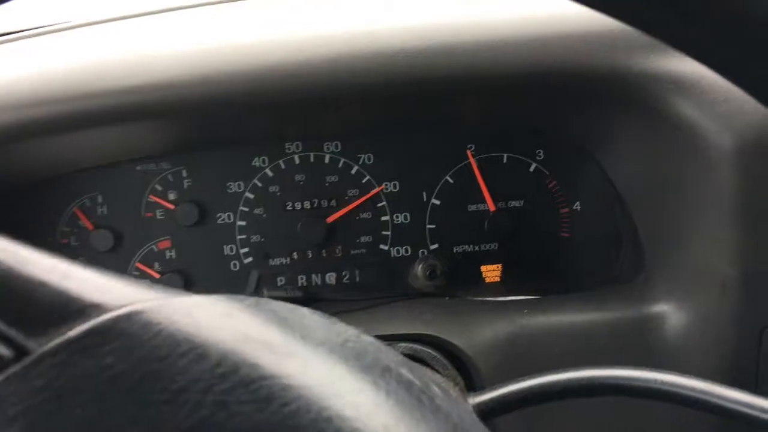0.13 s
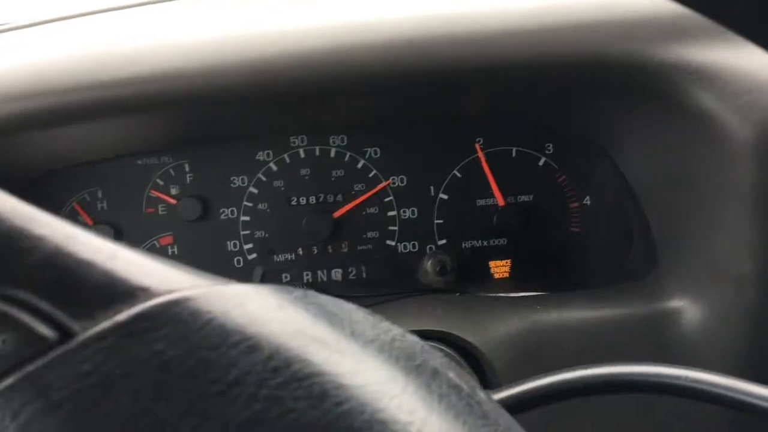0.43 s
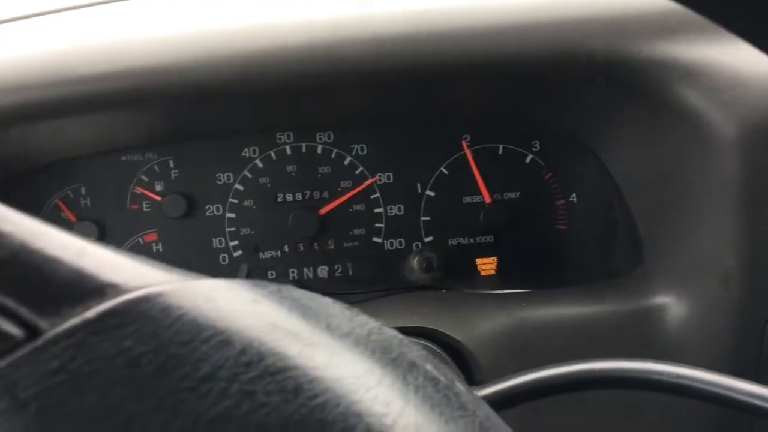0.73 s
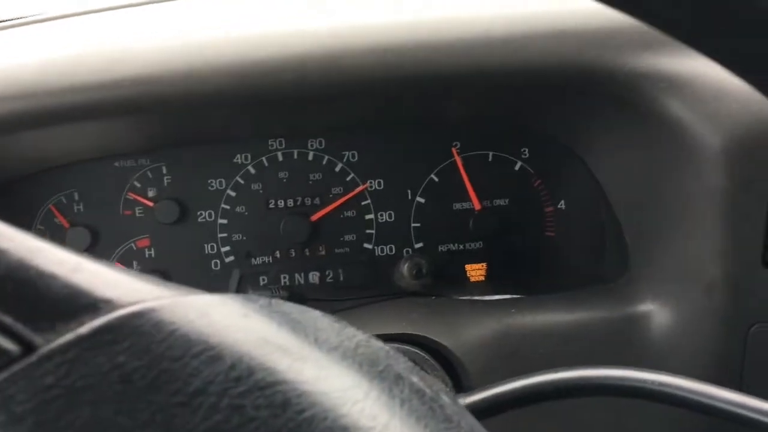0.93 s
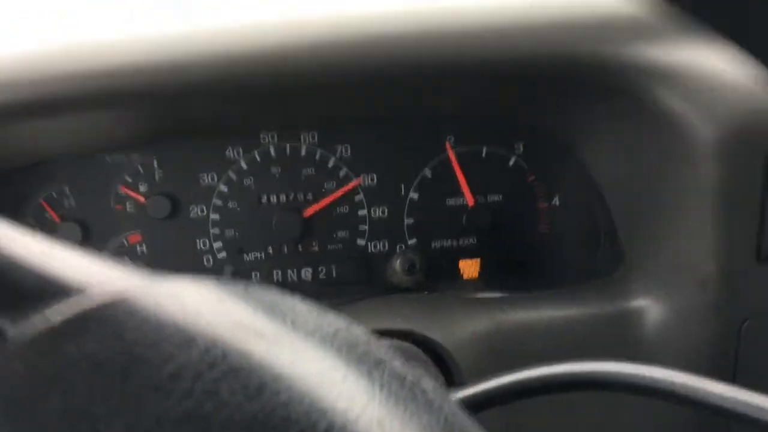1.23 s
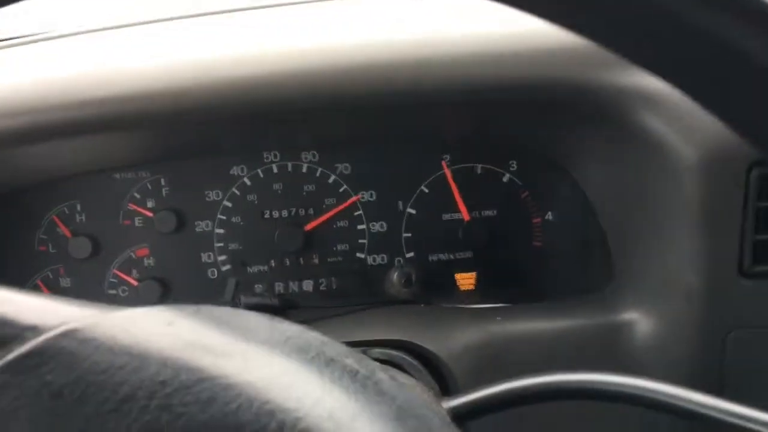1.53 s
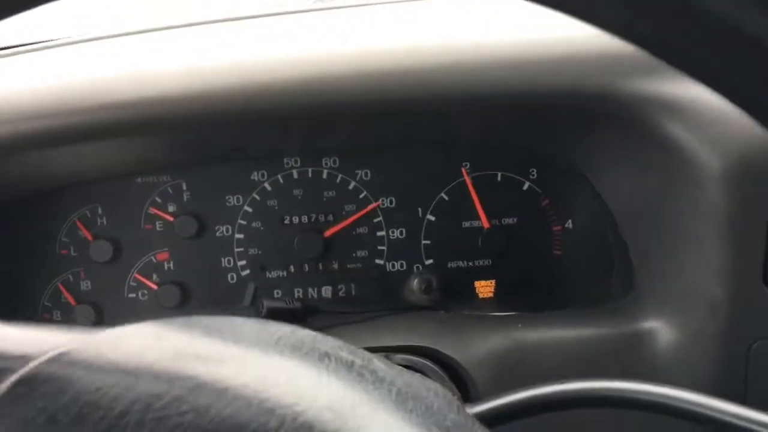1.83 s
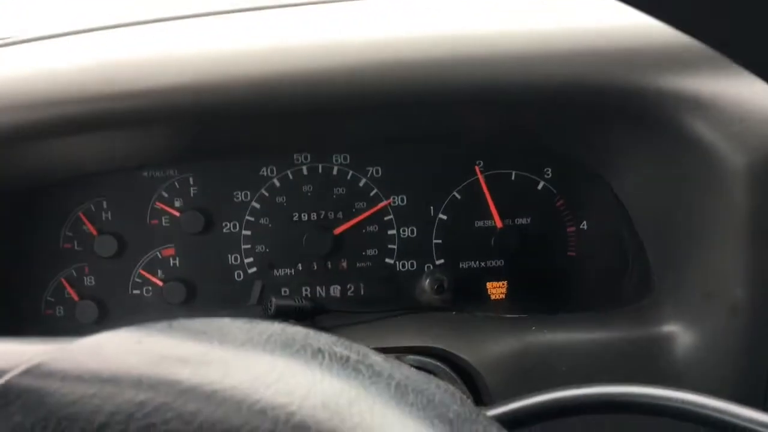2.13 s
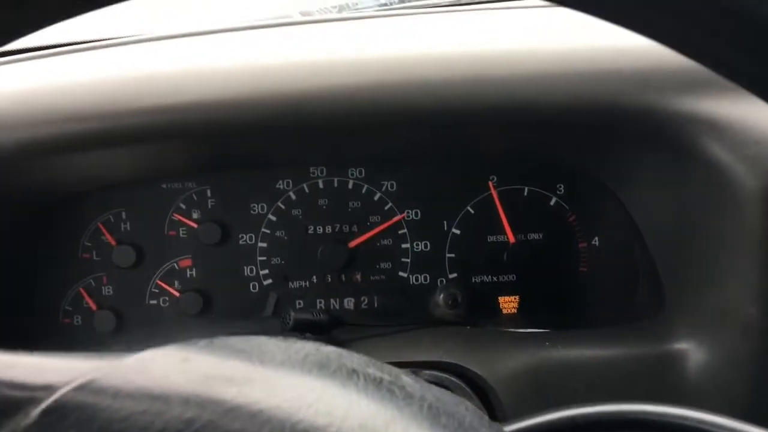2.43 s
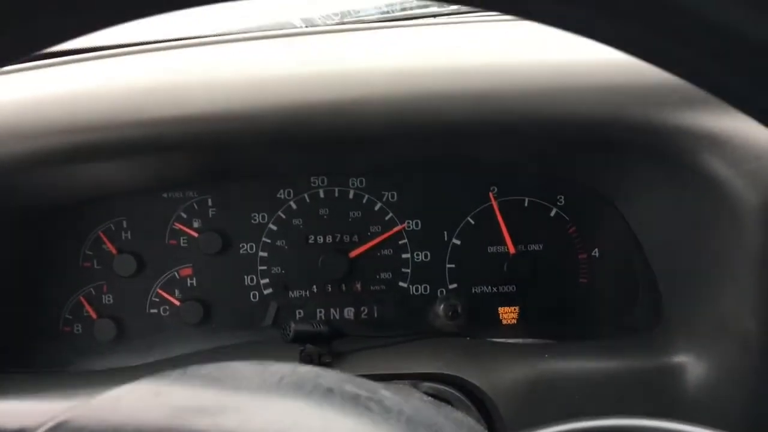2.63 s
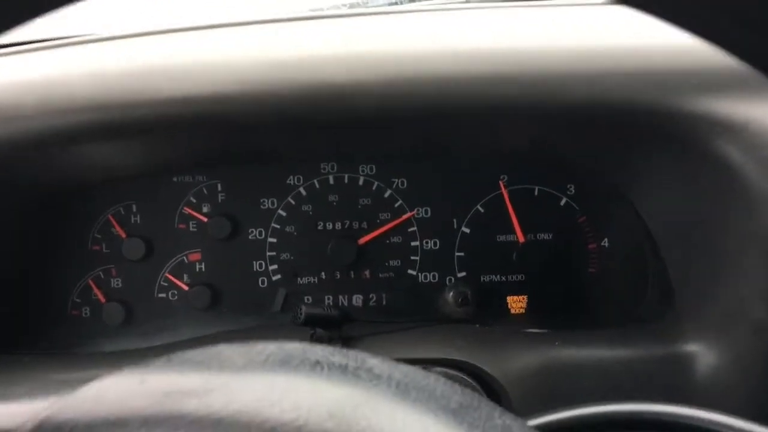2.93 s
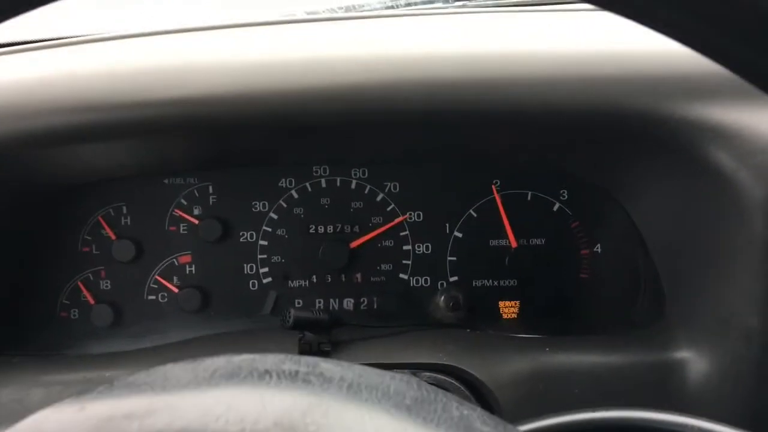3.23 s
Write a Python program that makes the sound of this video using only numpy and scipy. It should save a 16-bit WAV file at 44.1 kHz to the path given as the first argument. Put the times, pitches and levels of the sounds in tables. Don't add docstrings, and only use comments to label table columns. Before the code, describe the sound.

Turbocharger surge heard inside a diesel truck cab at steady highway speed: low engine boom and road roar with a pulsing hiss, then the hiss dies and eight quick hooting puffs flutter, close at the dashboard.

```python
import sys
import numpy as np
from scipy import signal
from scipy.fft import rfft, irfft
from scipy.io import wavfile

SR = 44100
rng = np.random.default_rng(int(sys.argv[2]) if len(sys.argv) > 2 else 0)


def to_linear_factor(level_db):
    exponent = np.asarray(level_db, float) / 20
    return 10 ** exponent


def wav_out(sig):
    wavfile.write(sys.argv[1], SR, np.round(np.clip(np.atleast_2d(sig).T, -1, 1) * 32767).astype(np.int16))


N = 148617
T = np.arange(N) / SR

# (time [s], four-stroke cycles per second [Hz])
ENGINE_SPEED = [(0, 16.62), (1.1, 16.615), (1.5, 16.585), (2.1, 16.59), (2.3, 16.72), (2.55, 16.57),
                (3.4, 16.54)]
WHEEL_HZ = 12.39
WOBBLE_RAD = .15


def rms_one(x):
    return x / np.sqrt(np.mean(x ** 2) + 1e-20)


def in_time(rows):
    s, *columns = np.transpose(rows)
    return [np.interp(T, s, c) for c in columns]


def drift(rate_hz):
    r = np.exp(-80 * np.pi * rate_hz / SR)
    noise = rng.standard_normal(N // 40 + 2002)
    slow = signal.lfilter([1], [1, -2 * r, r * r], noise)[2000:]
    return np.interp(np.arange(N) / 40, np.arange(len(slow)), rms_one(slow))


def air(spectrum, peaks, patchy_db):
    hz = np.maximum(np.arange(N // 2 + 1) * SR / N, 1)
    colour_hz, colour_db = np.transpose(spectrum)
    db = np.interp(np.log(hz), np.log(colour_hz), colour_db, left=-80)
    for centre, width, lift in peaks:
        db = db + lift / (1 + (2 * (hz - centre) / width) ** 2)
    full = rfft(rng.standard_normal(N)) * to_linear_factor(db)
    half_octave = np.floor(2 * np.log2(hz))
    total = np.zeros(N)
    for k in range(8, 29):
        total += irfft(full * (half_octave == k), N) * to_linear_factor(patchy_db * drift(9.9))
    return rms_one(total)


def orders(turns, table, wobble_rad, shape):
    total = np.zeros(N)
    for multiple, db in table:
        level = np.sqrt(2) * to_linear_factor(db + .8 * drift(1.6))
        phase = 2 * np.pi * (round(multiple) * turns + shape) + wobble_rad * drift(2)
        total += level * np.cos(phase)
    return total


def road_and_wind():
    # (frequency [Hz], density [dB per Hz])
    roar = [(22, -29), (52, -2), (75, 0.5), (140, -5.5), (300, -18.5), (500, -23.5), (1200, -28.5),
            (4000, -42)]
    # (frequency [Hz], width [Hz], lift [dB])
    cab_modes = [(635, 76, 10.5), (862, 55, 3.5), (1625, 49, 3), (1800, 89, 3.5), (2004, 40, 7),
                 (2310, 130, 3.5), (2500, 88, 8)]
    # (frequency [Hz], density [dB per Hz])
    wind = [(2500, -30), (4000, -5), (4800, 5), (6000, 4), (9000, 3), (10500, -3.5), (14000, 3.5),
            (16000, 2)]
    roar_db, wind_db = -19, -38.5
    rumble = to_linear_factor(roar_db) * air(roar + [(16000, -73)], cab_modes, patchy_db=.7)
    return rumble + to_linear_factor(wind_db) * air(wind, [], patchy_db=1.1)


def tyres():
    # (multiple of the wheel turn, level [dB])
    thump_orders = [(3, -35.5), (4, -25.5), (5, -36.5), (6, -25.5), (7, -24), (8, -38.5), (10, -34.5),
                    (15, -45.5), (26, -48.5)]
    # (time [s], turns per second [Hz])
    tread_speed = [(0, 12.37), (1.8, 12.33), (3.4, 12.29)]
    # (multiple of the turn, level [dB])
    tread_orders = [(51, -47), (52, -45), (53, -39), (54, -41), (55, -49), (60, -54)]
    thump = orders(WHEEL_HZ * T - .24, thump_orders, WOBBLE_RAD, shape=.1)
    tread_turns = np.cumsum(in_time(tread_speed)[0]) / SR
    return thump + orders(tread_turns, tread_orders, wobble_rad=.45, shape=0)


def engine():
    # (time [s], gain [dB])
    load = [(0, -5), (1.1, -2), (2.1, -2.5), (2.6, 2), (3.4, 3.5)]
    # (multiple of the cycle, level [dB])
    engine_orders = [(2, -48), (4, -20.5), (5, -32.5), (6, -25.5), (7, -70), (9, -36.5), (10, -38),
                     (11, -41), (12, -50), (14, -50.5), (16, -51), (17, -50), (18, -41.5), (20, -45.5),
                     (24, -48), (25, -46.5), (28, -66), (32, -48)]
    firing_db, lag_cycles, pulse_shape = -22.5, .205, .73
    speed_hz, = in_time(ENGINE_SPEED)
    load_db, = in_time(load)
    cycles = np.cumsum(speed_hz) / SR - lag_cycles
    firing = orders(cycles, [(8, firing_db)], WOBBLE_RAD, pulse_shape)
    return to_linear_factor(load_db) * firing + orders(cycles, engine_orders, WOBBLE_RAD, pulse_shape)


def compressor():
    # (time [s], hiss level [dB], blade whistle level [dB])
    flow = [
        (0, -41, -50),
        (.5, -36.5, -47),
        (1.2, -36, -49),
        (2.1, -36, -46),
        (2.2, -39, -42),
        (2.3, -55, -40),
        (2.41, -62, -39),
        (2.47, -55, -45),
        (3.4, -62, -60),
    ]
    # (time [s], frequency [Hz])
    blades = [(0, 14800), (1.2, 14740), (2.1, 14680), (2.2, 14880), (2.3, 15230), (2.41, 15620),
              (2.5, 15900)]
    # (frequency [Hz], density [dB per Hz])
    hiss_colour = [(2500, -7), (4000, -8.5), (4800, -11.5), (5800, -3.5), (8700, -0.5), (10500, -5),
                   (14300, -8.5), (16000, -8.5)]
    # (frequency [Hz], width [Hz], lift [dB])
    hiss_peaks = [(4290, 230, 10), (5930, 520, 7), (6940, 200, 3.5), (8400, 130, 4), (8900, 400, 3),
                  (12200, 120, 6), (13500, 200, 8), (3270, 150, 6)]
    whistle_width_hz, whistle_wander_hz = 350, 60
    hiss_db, whistle_db = in_time(flow)

    cycle = np.cos(2 * np.pi * ENGINE_SPEED[0][1] * (T - .211))
    turn = np.cos(2 * np.pi * WHEEL_HZ * (T - .215))
    sway_db = -2 * cycle - .56 * turn + .5 * drift(3.5)
    hiss = to_linear_factor(hiss_db + sway_db) * air(hiss_colour, hiss_peaks, patchy_db=.5)

    hz = in_time(blades)[0] + whistle_wander_hz * drift(8.5)
    phase = 2 * np.pi * np.cumsum(hz) / SR
    low = signal.butter(2, whistle_width_hz / 2, fs=SR, output="sos")
    breath_cos, breath_sin = signal.sosfilt(low, rng.standard_normal((2, N)))
    whistle = rms_one(breath_cos * np.cos(phase) + breath_sin * np.sin(phase))
    return hiss + to_linear_factor(whistle_db + .4 * sway_db + 2 * drift(11)) * whistle


def swell(start, length, sag_db_per_s):
    attack_s, release_s = .024, .033
    up = np.clip((T - start) / attack_s, 0, 1)
    down = np.clip((start + length + release_s - T) / release_s, 0, 1)
    sag = to_linear_factor(-sag_db_per_s * np.clip(T - start, 0, 1))
    return np.sin(np.pi / 2 * np.minimum(up, down)) ** 2 * sag


def surge():
    # (start [s], length [s], puff level [dB], hoot level [dB])
    surges = [
        (2.449, .04, -32.5, -40),
        (2.555, 0.048, -31, -36.5),
        (2.665, 0.042, -29, -37),
        (2.77, 0.052, -29, -35.5),
        (2.873, 0.052, -28, -32),
        (2.985, 0.148, -27.5, -30.5),
        (3.173, 0.054, -28, -28),
        (3.282, 0.075, -28.5, -28.5),
    ]
    # (frequency [Hz], density [dB per Hz])
    puff_colour = [(900, -4), (1500, -11), (3000, 1), (4900, -6), (6000, -5.5), (9000, -2), (10500, -3),
                   (16000, -6)]
    # (frequency [Hz], width [Hz], lift [dB])
    duct_modes = [(2604, 46, 14), (2700, 97, 1), (4320, 200, 4), (5850, 560, 11), (7100, 150, 7),
                  (8900, 150, 6.5), (10700, 120, -7), (11550, 83, 7.5), (12740, 300, 4.5), (14300, 200, 4)]
    # (multiple of its pitch, level [dB])
    hoot_partials = [(1, -1.5), (2, -13.5), (3, -15.5)]
    hoot_hz, rise_hz, rise_s, droop_hz_per_s, jitter_hz = 1374, 60, .036, 90, 10
    hoot_lag_s, flutter_db, octave_db = .012, 1.8, -7

    puff, hoot_level = np.zeros(N), np.zeros(N)
    for start, length, puff_db, hoot_db in surges:
        puff += to_linear_factor(puff_db) * swell(start, length, sag_db_per_s=37)
        hoot_level += to_linear_factor(hoot_db) * swell(start + hoot_lag_s, length - hoot_lag_s, sag_db_per_s=5.9)

    starts = np.array(surges)[:, 0] + hoot_lag_s
    since = T - starts[np.clip(np.searchsorted(starts, T) - 1, 0, None)]
    below = 1 / (1 + (np.maximum(since, 0) / rise_s) ** 2)
    droop_hz = droop_hz_per_s * np.clip(since, 0, .2)
    turns = np.cumsum(hoot_hz - rise_hz * below - droop_hz + jitter_hz * drift(41.4)) / SR
    hoot = np.zeros(N)
    for multiple, db in hoot_partials:
        level = np.sqrt(2) * to_linear_factor(db + flutter_db * drift(45))
        hoot += level * np.sin(2 * np.pi * round(multiple) * turns)

    octave = to_linear_factor(octave_db + 3.2 * drift(35)) * np.sin(2 * np.pi * 2 * turns)
    return puff * air(puff_colour, duct_modes, patchy_db=2.0), hoot_level * hoot + puff * octave


def cab(x):
    ripple_db, ripple_hz = 2.3, 26
    notch_hz, notch_width_hz, notch_db = 4830, 450, -3.5
    hz = np.arange(N // 2 + 1) * SR / N
    knots = np.arange(0, SR / 2, ripple_hz)
    ripple = np.interp(hz, knots, rng.standard_normal(len(knots))) * np.clip(hz / 1000 - .7, 0, 1)
    notch = notch_db / (1 + (2 * (hz - notch_hz) / notch_width_hz) ** 2)
    return irfft(rfft(x) * to_linear_factor(ripple_db * ripple + notch), N)


def scene():
    puffs, hoots = surge()
    in_cab = road_and_wind() + tyres() + engine() + compressor() + puffs
    return (cab(in_cab) + hoots)[None]


def low_pass(x):
    return signal.sosfilt(signal.butter(12, 16760, fs=SR, output="sos"), x)


def record(dry):
    start_s, fade_in_s, fade_out_s = .1535, .002, .0021
    fade_in = np.clip((T - start_s) / fade_in_s, 0, 1)
    fade_out = np.clip((T[-1] - T) / fade_out_s, 0, 1)
    rounded = 1.903 * np.tanh(dry * fade_in * fade_out / 1.712)
    low = signal.ellip(12, .5, 70, 15720, fs=SR, output="sos")
    return low_pass(signal.sosfilt(low, rounded))


dry = scene()
out = record(dry)
wav_out(out)
```